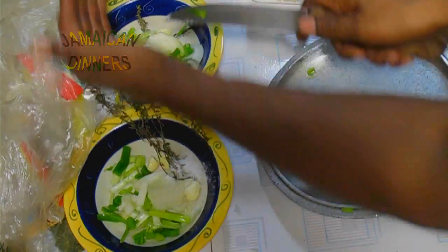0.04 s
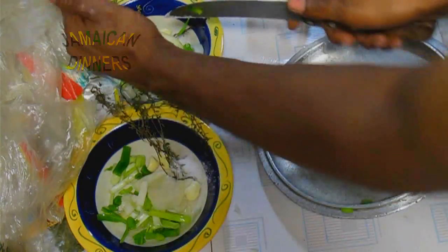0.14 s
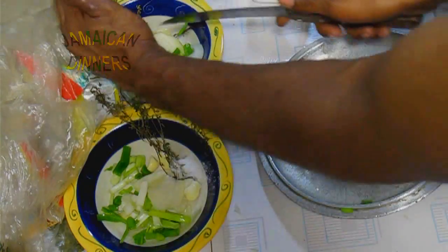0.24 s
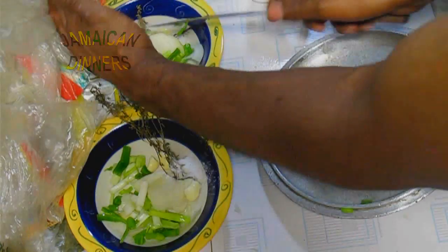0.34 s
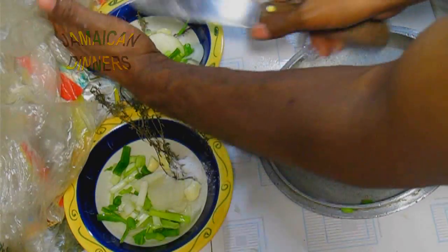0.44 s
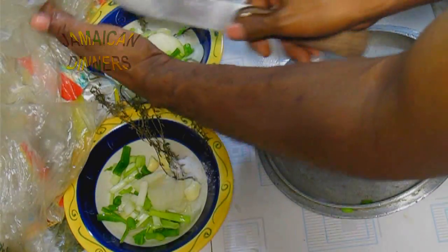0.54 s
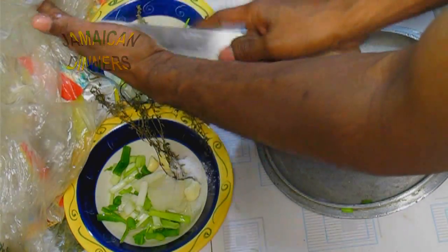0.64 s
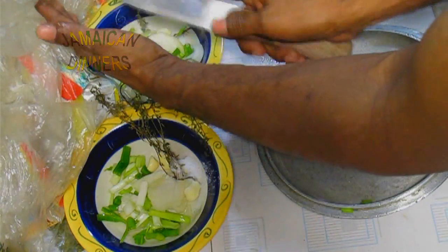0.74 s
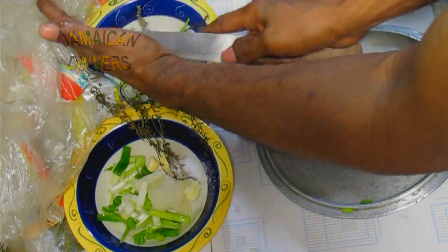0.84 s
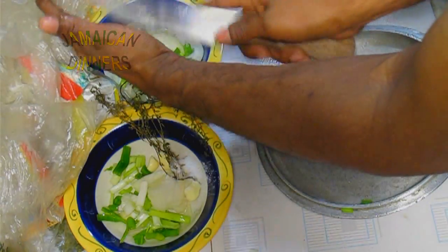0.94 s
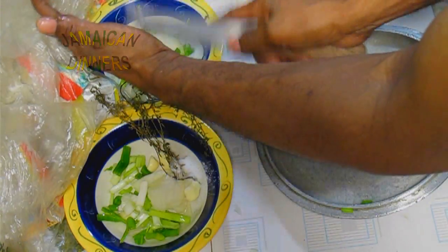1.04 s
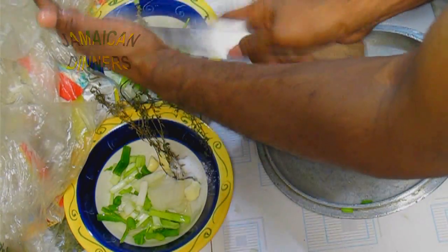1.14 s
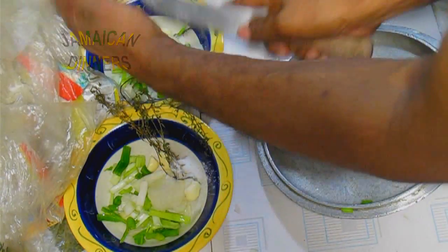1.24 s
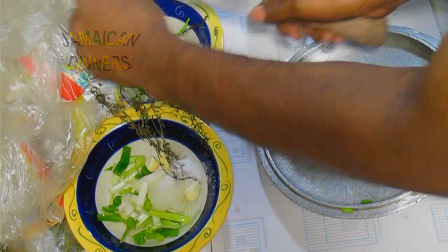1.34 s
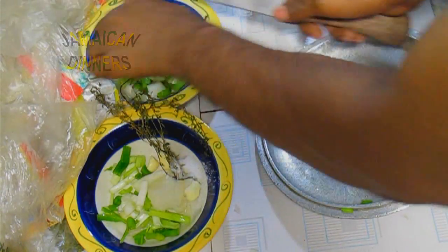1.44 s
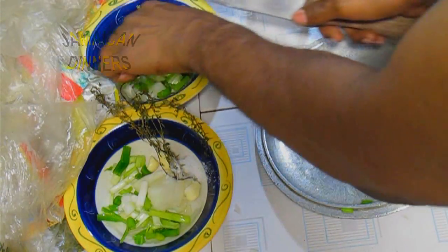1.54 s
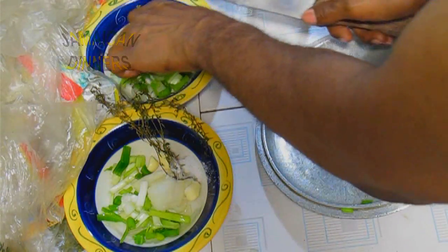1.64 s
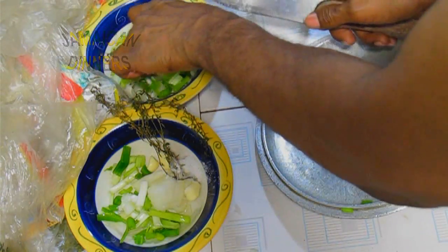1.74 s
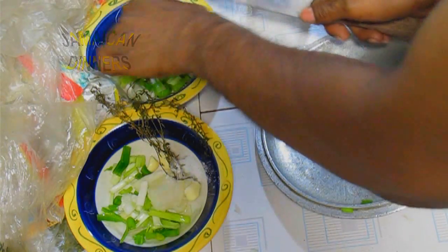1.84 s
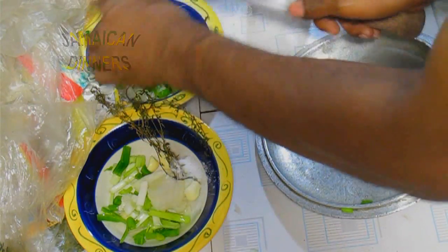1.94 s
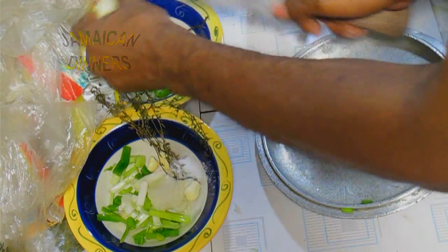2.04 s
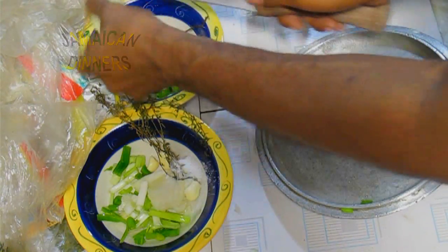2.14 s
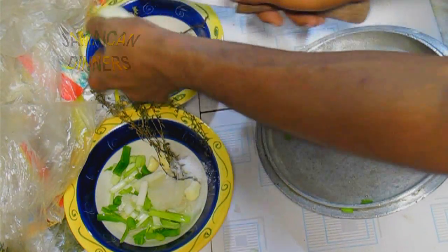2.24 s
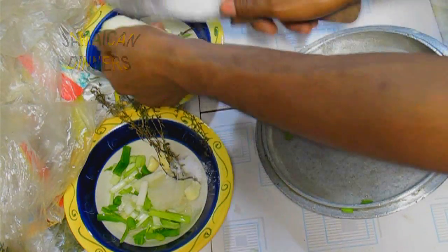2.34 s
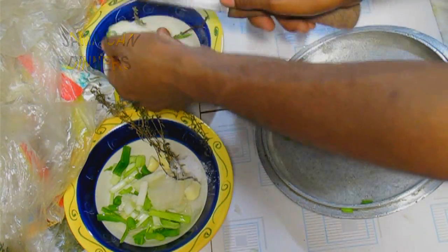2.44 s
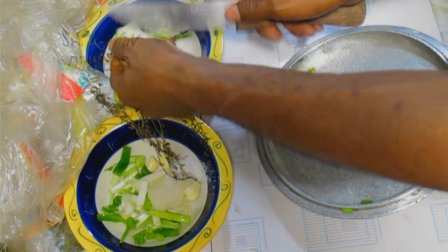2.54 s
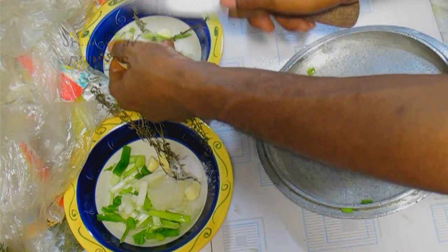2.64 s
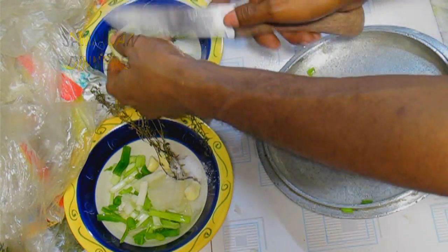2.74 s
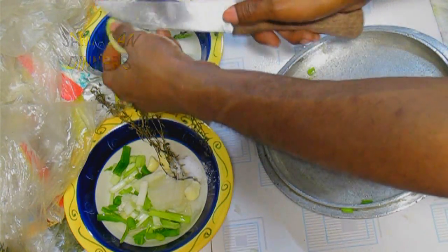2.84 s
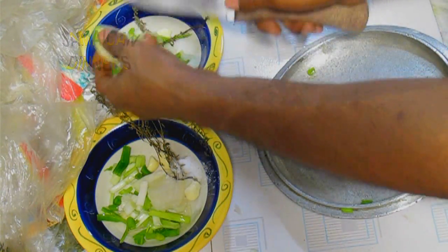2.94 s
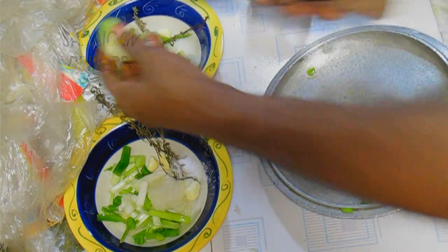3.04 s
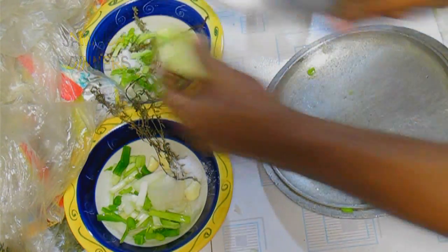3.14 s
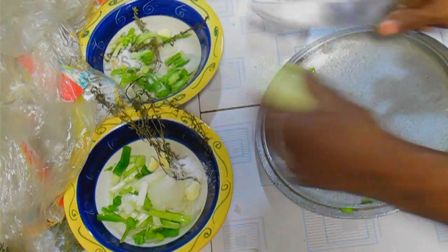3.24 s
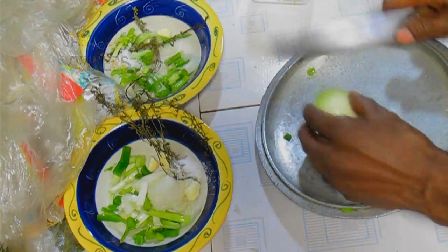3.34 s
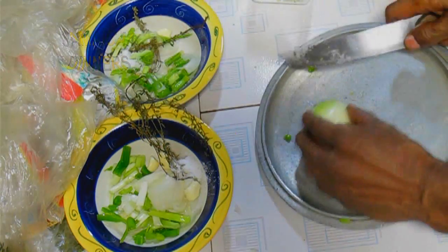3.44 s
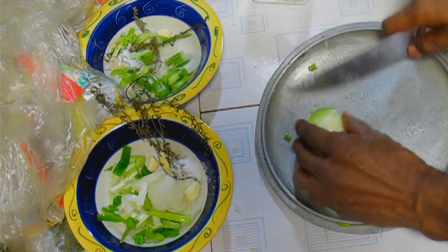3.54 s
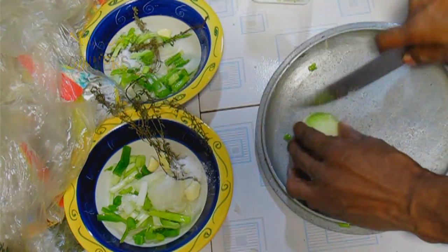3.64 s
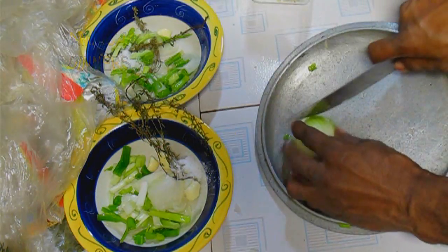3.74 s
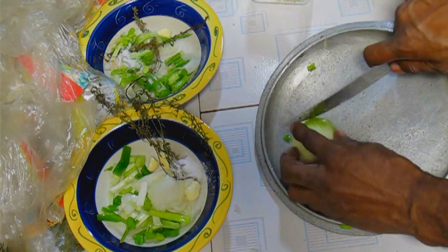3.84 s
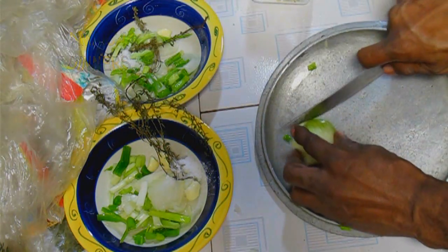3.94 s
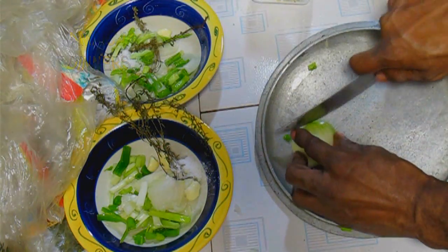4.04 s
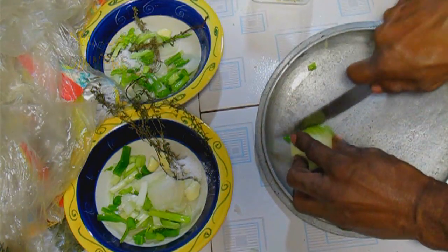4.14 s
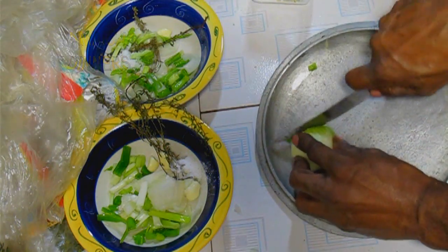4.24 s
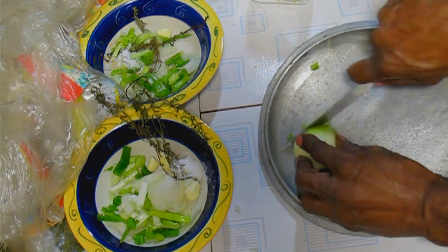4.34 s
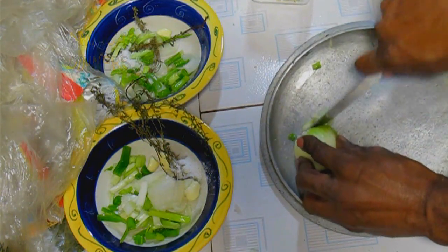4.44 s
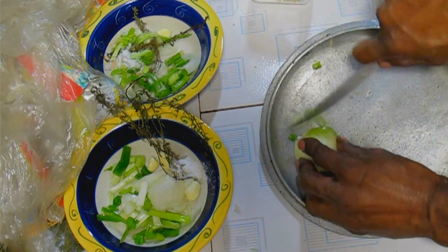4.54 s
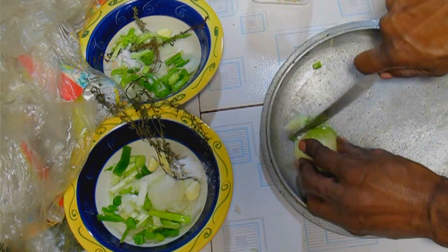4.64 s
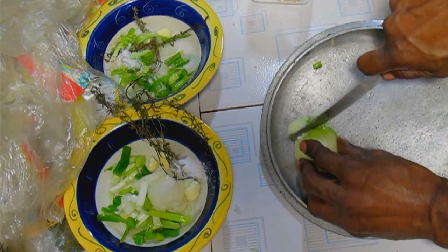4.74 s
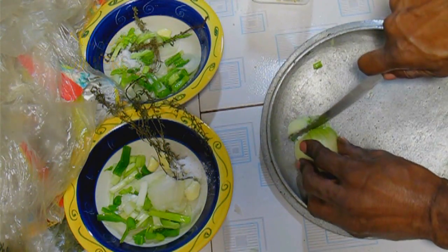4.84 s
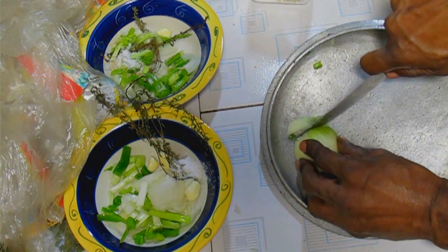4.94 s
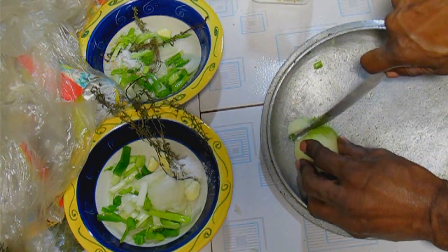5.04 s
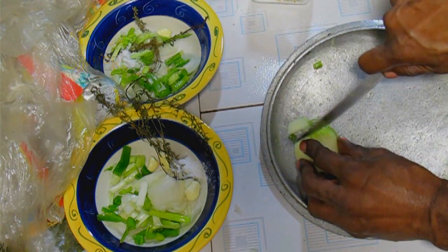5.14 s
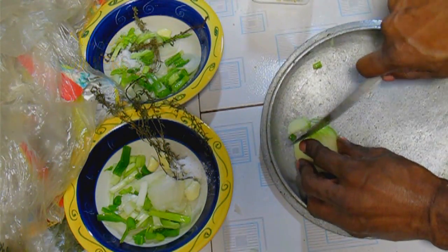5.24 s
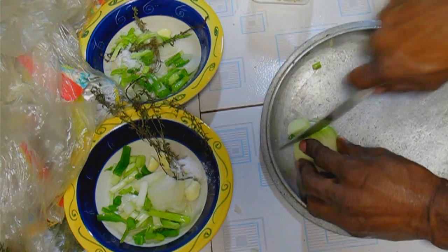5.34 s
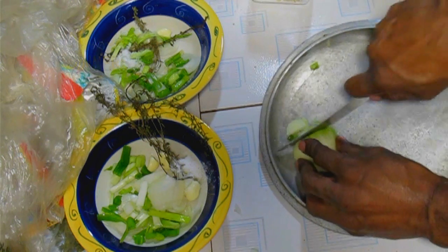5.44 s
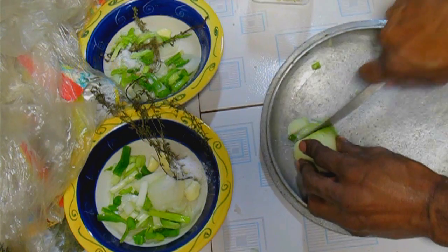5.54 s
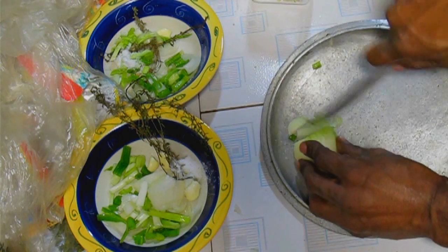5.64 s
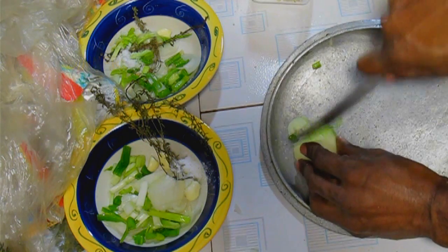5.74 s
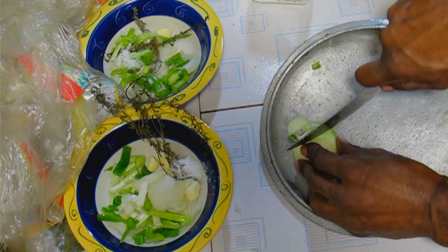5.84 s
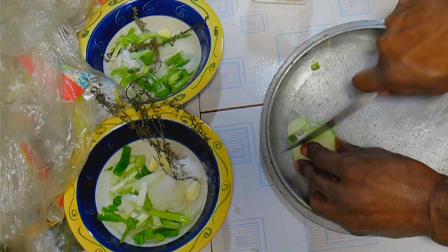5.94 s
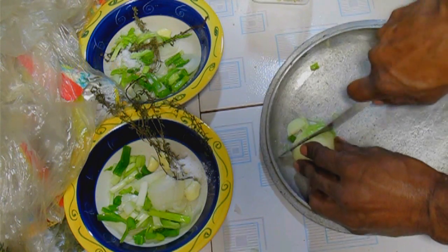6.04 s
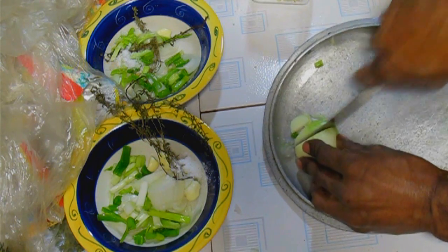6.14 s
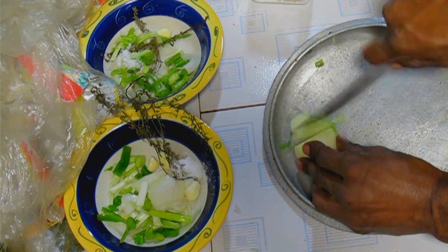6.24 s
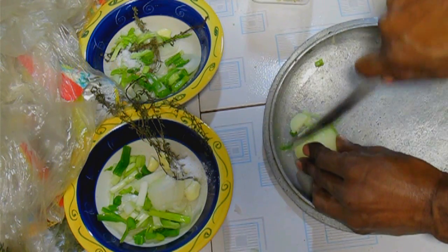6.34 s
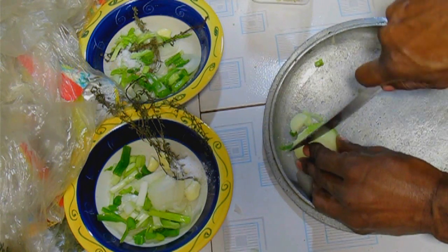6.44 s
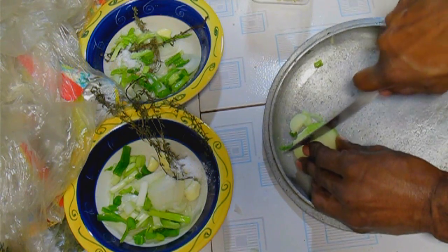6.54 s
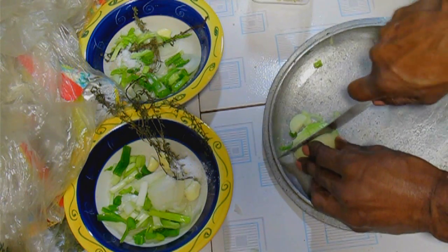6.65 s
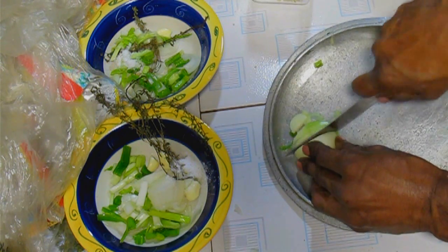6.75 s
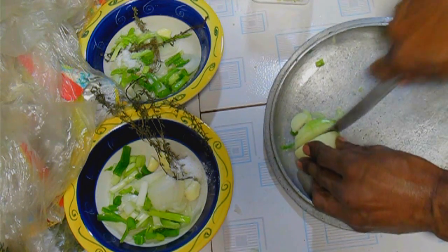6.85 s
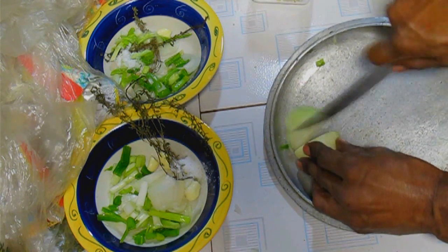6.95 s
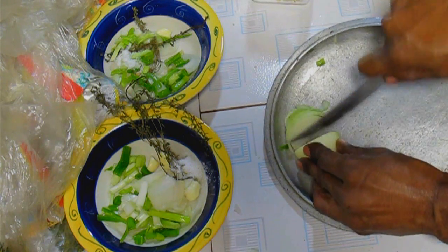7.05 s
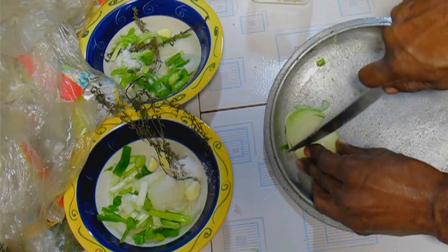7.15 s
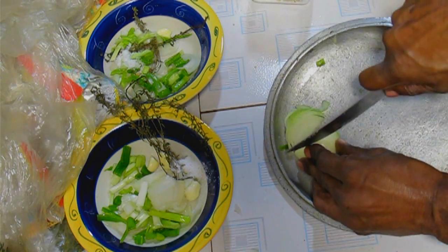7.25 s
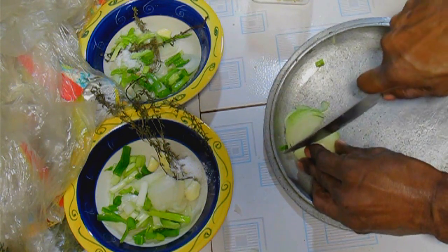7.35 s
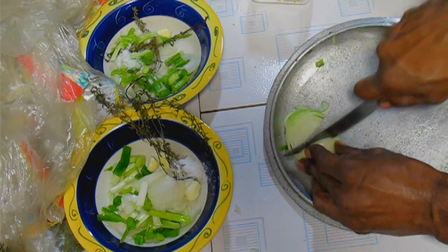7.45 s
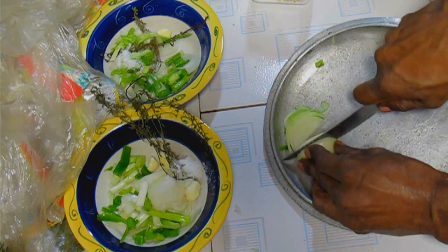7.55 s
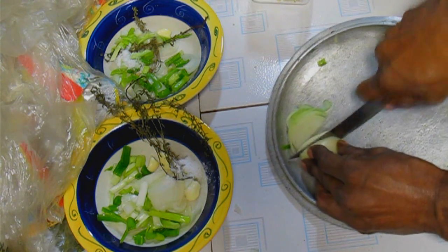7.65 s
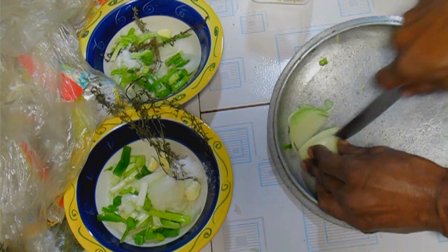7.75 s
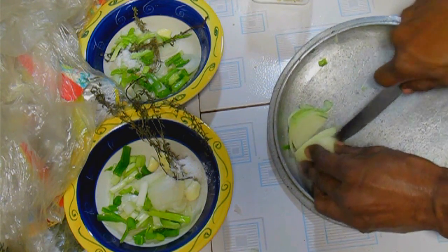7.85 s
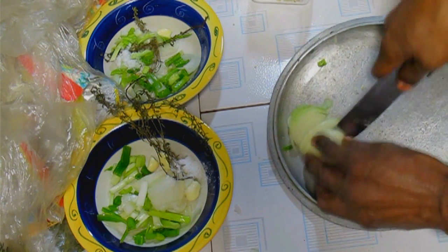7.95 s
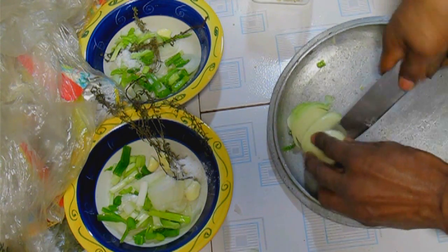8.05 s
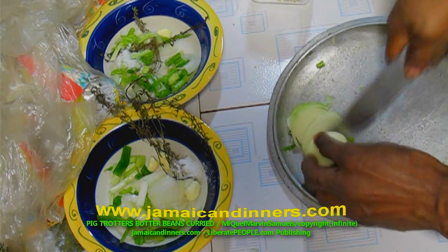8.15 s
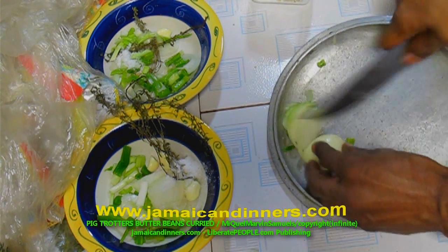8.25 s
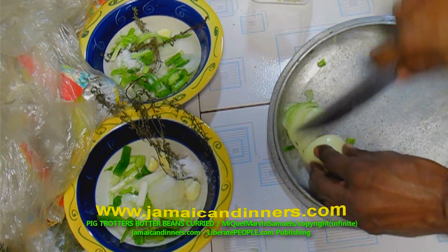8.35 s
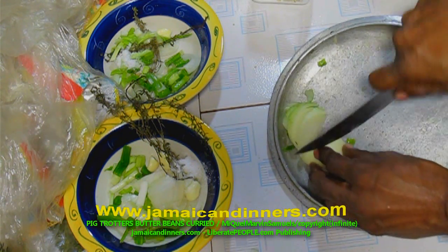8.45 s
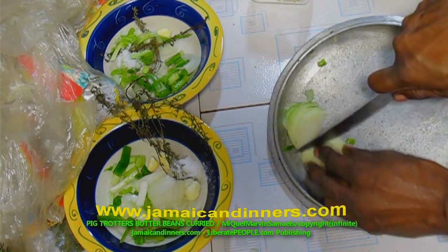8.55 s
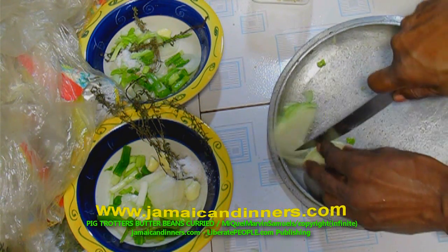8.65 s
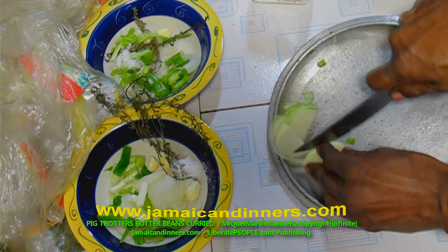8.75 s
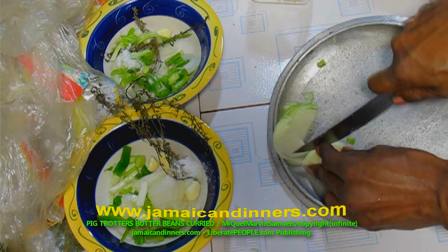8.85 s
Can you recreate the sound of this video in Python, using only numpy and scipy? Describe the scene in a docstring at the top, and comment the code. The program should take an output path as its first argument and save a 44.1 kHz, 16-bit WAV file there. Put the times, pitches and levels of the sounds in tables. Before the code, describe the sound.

A close microphone in a small kitchen picks up steady bright hiss, a faint throbbing low hum and a barely audible drifting tone that vanishes near 4 s. From 0 to 3 s, soft dull knife knocks on a bowl, tiny dry ticks, a short scrap rustle around 0.3-0.6 s and quick grainy wet swishes of fingers on steel, mostly 0.7-1.3 s, sparser later. At 3.5-3.6 s the knife clacks loudly on the tray, then a light scrape. Onion slicing comes in rapid crunch-and-knock clusters at about 4.2-4.4, 5.4-5.6, 6.0-6.2, 6.6-6.8 and 7.4-7.6 s: crisp crackle, short thin metallic ring, dull table thud, the hardest hits clipped. Gritty drags with faint high squeaks and soft pats fill the gaps. After 7.8 s only lighter taps and scrapes remain until about 8.9 s. The room tail is short.

```python
"""Slicing an onion on a metal tray

An onion is sliced on a thin metal tray in a small kitchen; before that a hand wipes scraps off the blade over a bowl.
Blows and knocks excite decaying modes and noise; drags, wipes and rustling scraps are friction noise under envelopes.
A bright hiss and a wavering hum lie beneath, with a faint drifting tone that dies away near the first blows.
A short diffuse room tail follows the work, and the microphone clips the strongest peaks."""
import sys
import numpy as np
from scipy import signal
from scipy.fft import rfft, irfft
from scipy.io import wavfile
from scipy.ndimage import map_coordinates

SR = 44100
rng = np.random.default_rng(int(sys.argv[2]) if len(sys.argv) > 2 else 0)


def inscribe(sig):
    """Save sig as 16-bit PCM at rate SR to the path in sys.argv[1].

    A 1-D sig is mono; a 2-D sig holds one channel per row.
    Samples are clipped to [-1, 1] before scaling.
    """
    pcm = np.round(np.clip(np.atleast_2d(sig).T, -1, 1) * 32767)
    wavfile.write(sys.argv[1], SR, pcm.astype(np.int16))


N = 392490   # length in samples

# Blade blows on the tray; low ring and bright edge are relative to the blow level:
# start_s, level_db, low_ring_db, ring_centre_octaves (above the lowest mode), bright_edge_db
BLOWS = [(3.989,-37.5,1.5,3,-21),(4.017,-35.5,6.5,3.26,-7),(4.218,-16,-8,1.93,-7),(4.237,-7.5,-2,0.56,-13.5),
         (4.251,-7.5,-14,1.06,-16),(4.278,-4.5,-19,1.65,-13),(4.393,-25.5,-26,1,-1),(4.408,-21.5,-21,1.2,-9),(4.415,-15.5,-19,2,-5),
         (4.427,-13,-19,1.2,-13),(4.432,5.5,-16,3.6,-18),(4.59,-34,3,2.7,-7),(4.875,-47.5,-30,1.5,10.5),(4.999,-25.5,-15,1.33,-7.5),(5.194,-27.5,-8,2.28,-7.5),
         (5.369,-26.5,-7.5,2.4,-11),(5.416,-22,-2,2.5,-7),(5.421,-15,-9.5,1.7,-5.5),(5.442,-7,-6,0.79,-12),(5.456,-3,-17,2.46,-14.5),
         (5.467,-3,-11,1.5,-15),(5.472,-14.5,11,2.47,-36),(5.525,-25,-17,2.9,-1),(5.562,-8.5,-19,1.2,-15),
         (5.57,1,-11.5,3.67,-3.5),(5.979,-14,-4,2.2,-7),(6.021,-15,0,2.34,-4),(6.047,-7,-4.5,1.86,-4.5),
         (6.065,-4.5,-9,1.38,-11),(6.078,-0.5,-11.5,2.1,-15),(6.097,-8,-8.5,2.76,-1.5),(6.109,1.5,-21,2.8,-8.5),
         (6.236,-24.5,-9,1.5,1),(6.247,-12,-6,3.72,-21),(6.572,-24,-7,2.24,-10.5),(6.63,-8,-3,2.16,-9.5),
         (6.649,-6,-12,2.64,-10),(6.668,-5,-5,1.46,-10.5),(6.687,-4,-13.5,2.4,-12.5),(6.717,.5,-26,4.4,-15),
         (6.722,-14.5,8.5,2.66,-33),(6.762,-5.5,-35,2.1,-12),(6.819,-20,-4,2.5,-10),(6.836,-1,-24,2.4,-21),(6.84,-12.5,0.5,3.16,-33),
         (6.976,-15,-22,2.2,-19),(7.014,-32,-22,1.5,-1),(7.366,-35.5,-8,2.3,-3),(7.404,-15,-11,2.3,-11),(7.454,-7.5,-5.5,2.3,-12.5),
         (7.48,-4.5,-3.5,2.16,-11),(7.499,-7.5,-9.5,2.6,-9.5),(7.524,-7.5,-6.5,2.4,-9),(7.552,-3,-11,2.18,-16),
         (7.567,-7,-16,2.56,-6),(7.581,-8.5,-5,2.77,-32),(7.623,-36,-21,3.2,-25),(7.698,-25.5,-2.5,2.45,-10),
         (7.727,-20.5,-12,3.7,-7.5),(7.815,-11,-7,3.78,-10.5),(7.923,-24.5,-7.5,2.2,-31),(7.962,-30,-22,2,-3),
         (8.005,-32,-26,2.8,0),(8.04,-28,-4,3.5,-27),(8.072,-26.5,-7,3.2,-16),(8.091,-18.5,-8,2.4,-38),
         (8.203,-22.5,-34,4.5,-3.5),(8.241,-21.5,-29,3.5,-6.5),(8.286,-31,-3,2.7,-26),(8.303,-38,6.5,2.95,-21),
         (8.327,-27.5,-8,2.8,-16),(8.342,-35.5,9,3.06,-25),(8.408,-39,-1.5,2.86,-18),(8.437,-36.5,0,2.9,-24),
         (8.456,-26.5,0.5,3.36,-35),(8.575,-33.5,-23,1.5,-15.5),(8.632,-26,-9,1.4,-9.5),(8.798,-33,3,3.5,-20),
         (8.855,-32,4,3.9,-23)]
# Modes of the thin tray: pitch_hz, width_hz, level_db
TRAY_MODES = [(168.4, 21, -2.5), (345.7, 15, -9), (520, 15, -5.5), (640.3, 18, -14.5), (922, 46.6, -0.5),
              (1150, 31, -9.5), (1412, 32, -2.5), (1755, 21, -21), (2084, 63, -19), (2242, 43, -18.5),
              (2605, 42, -28), (3028, 27, -16), (3650, 44, -32.5), (3666, 110, -13), (4000, 46, -16.5),
              (4480, 56, -41), (5084, 80, -10), (5430, 110, -26.5), (5400, 160, -24.5), (6770, 91, -8.5),
              (8190, 63, -8.5), (8575, 87, -6.5), (9160, 310, -17), (9290, 78, -9), (10400, 280, -20.5)]
# Colour of the onion's crack: frequency_hz, density_db (per Hz)
CRACK_SPECTRUM = [(180, 0), (300, -19.5), (733, 0.5), (1440, 2), (1760, -0.5), (2840, 7.5), (3300, 6.5),
                  (5160, -0.5), (5790, -5), (7540, -6), (9200, -3.5), (11000, -6), (12000, -15),
                  (15600, -29)]
UPPER_HZ, BRIGHT_HZ = 1800, 6000   # borders between the tray's groups of modes
CONTACT_PEAK_MS, CONTACT_SPREAD_DB = 1.17, 0.5   # rise time of a contact, and its scatter
BELOW_DB_PER_OCT, ABOVE_DB_PER_OCT = 9.5, 33.5   # fall of the ring below and above its centre

# Blade and onion dragged over the tray; deep and bright parts are relative to the level:
# start_s, end_s, first_level_db, last_level_db, deep_part_db, bright_part_db
DRAGS = [(3.756,3.92,-53.5,-58.5,-2,6.5),(3.992,4.218,-53,-47.5,-8.5,2.5),(4.3,4.343,-39,-65,-6,-9),
         (4.426,4.56,-36.5,-35.5,-7,-2),(5.375,5.413,-48,-47,-5,4),(5.504,5.54,-44,-57,5,8),(5.593,5.696,-37.5,-28.5,-15,-0.5),
         (6.13,6.185,-40,-30,-19,-3),(6.207,6.267,-36,-22.5,-13,-2.5),(6.824,6.833,-22.5,-21.5,-10.5,3),(6.87,6.982,-34.5,-30.5,-9.5,0),
         (7.66,7.81,-50,-34.5,-11,5.5),(7.832,7.908,-33.5,-49,-6,1.5),(7.943,8.088,-45.5,-51.5,-0.5,6),
         (8.102,8.173,-42.5,-56,-4,-10),(8.19,8.34,-40,-54,-5.5,2.5),(8.664,8.721,-38.5,-51,0,1)]
# Colour of the rubbing: frequency_hz, density_db (per Hz)
RUB_SPECTRUM = [(590, -38), (1000, 7.5), (1260, -7.5), (1440, 5), (1900, -42.5), (2140, -5), (3050, 5.5),
                (3340, 2.5), (5120, -6), (7480, -17), (8890, -2), (11800, -11), (15600, -40.5)]
# The sliding edge sings: start_s, end_s, pitch_hz, level_db (against the drag's middle part)
SINGING = [(3.75, 3.83, 2900, 4), (3.848, 3.92, 2765, 4), (4.426, 4.585, 2720, -1), (5.606, 5.75, 3030, -1),
           (6.22, 6.298, 3085, -1), (6.884, 6.99, 3130, 0), (7.68, 7.783, 3550, 1),
           (7.835, 7.897, 3090, -1), (8.16, 8.298, 3970, 7), (8.19, 8.282, 5290, 8.5),
           (8.652, 8.72, 4120, -3)]
DRAG_ATTACK_S, DRAG_RELEASE_S = 0.015, 0.029

# The knife knocked against bowl and tray: start_s, level_db, contact_cutoff_hz, long_ring_db
KNOCKS = [(.017, -26.5, 1510, 9), (.173, -22, 1500, 8), (.322, -26.5, 900, 6), (1.957, -24, 1200, 6.5),
          (2.089, -34.5, 900, 6), (3.065, -36.5, 700, 10), (3.475, -21.5, 900, 0), (3.495, -12.5, 1690, 4),
          (3.574, 2, 5030, 2.5), (3.598, -11.5, 2530, 3)]
# Modes of the knife: pitch_hz, level_db, t60_s
KNIFE_MODES = [(519, -14.5, 0.15), (920, -19, 0.092), (1060, 9, 0.024), (1246, -16.5, 0.16),
               (1640, -17, 0.15), (2190, 1, 0.039), (2635, 4.5, 0.034), (2750, -12, 0.052),
               (2910, -11.5, 0.16), (4100, -14, 0.1), (4600, 2.5, 0.013), (5190, -6.5, 0.056),
               (6820, -10, 0.12), (8700, -15, .06), (8730, -13, 0.21), (10650, -15, .08)]
LONG_RING_S = .12   # modes with a longer t60 form the long ring

# Fingers wiping the wet blade: middle_s, level_db, spread_ms (of a bell-shaped swell), pitch_hz
WIPES = [(0.749, -34, 15, 2480), (.86, -49, 15, 2960), (0.929, -29, 11.4, 2890), (1.09, -26, 12.1, 2800),
         (1.15, -43.5, 6.3, 2500), (1.262, -27.5, 8.8, 3200), (1.31, -46.5, 13, 2960),
         (1.855, -40, 9.8, 2340), (2.385, -43, 6, 2300), (2.61, -44.5, 5, 2720), (2.798, -33, 5.8, 2400),
         (2.951, -42.5, 10, 2330)]
# Colour of the wiping: frequency_hz, density_db (per Hz)
WIPE_SPECTRUM = [(180, -56), (300, -7), (562, -7), (1090, -43), (1350, 3), (1620, -3.5), (2530, 4),
                 (3090, 1.5), (6720, -11), (9820, 5.5), (11800, -5.5), (15600, -31)]

# Dry ticks while scraps are picked off: start_s, level_db, upper_edge_hz
TICKS = [(0.256, -19.5, 3750), (0.296, -19, 4250), (0.348, -36, 8980), (0.386, -15, 9540),
         (0.396, -17, 9580), (0.417, -17, 9440), (0.478, -17, 7070), (0.489, -27, 9470),
         (0.564, -20.5, 7820), (0.612, -23, 8980), (0.672, -12, 9750), (0.907, -16, 2700),
         (1.067, -23, 9870), (1.306, -19, 9500), (1.5, -21.5, 9700), (1.851, -23, 6100), (2.047, -36, 6780),
         (2.385, -31, 9180), (2.788, -33, 9780), (2.789, -18, 4300), (2.939, -26, 9300), (2.94, -30, 4600),
         (4.686, -24, 3100), (5.843, -24, 1610), (7.141, -17.5, 1590)]
# Soft pats, bits of onion and fingers settling: start_s, level_db, pitch_hz, t60_s
PATS = [(.906, -21, 530, 0.011), (3.04, -39, 595, 0.028), (3.503, -25, 174, .08), (3.67, -33, 188, 0.067),
        (5.242, -28, 162, 0.062), (5.844, -25, 1660, 0.012), (5.89, -31, 185, 0.055),
        (6.489, -31, 172, 0.067), (7.139, -19.5, 1360, 0.015), (7.18, -37.5, 163, 0.087),
        (8.63, -23, 163, 0.068)]

# Scraps brushed off the palm: start_s, end_s, first_level_db, last_level_db
RUSTLE = [(.29, .5, -43, -35), (.51, .646, -43.5, -41)]
# Colour of the brushed scraps: frequency_hz, density_db (per Hz)
SCRAPS_SPECTRUM = [(180, -50), (300, -23), (535, -2.5), (1330, -9), (1850, -0.5), (6390, -4), (9820, 1.5),
                   (11800, -9), (15600, -37)]
RUSTLE_ATTACK_S, RUSTLE_RELEASE_S = 0.016, 0.0055

ROOM_T60_S, ROOM_DB = 0.25, -10.5

# Colour of the background hiss: frequency_hz, density_db (per Hz)
HISS_SPECTRUM = [(15, -21.5), (25, -0.5), (64, -7), (101, -5), (200, -8.5), (446, -13.5), (1030, -13),
                 (2020, -17.5), (3600, -16.5), (4400, -10), (7300, -13.5), (9880, -10), (11000, -11.5),
                 (12600, -22), (15600, -30)]
# Brighter bands in the hiss: centre_hz, width_hz, level_db
HISS_BANDS = [(4790, 110, 0.5), (5890, 210, 1.5), (6640, 430, 5), (7760, 270, 3), (8800, 180, 6),
              (9720, 320, 8.5)]
HISS_DB = -48.5   # rms of the hiss without its brighter bands

# Two hum tones: pitch_hz, level_db
HUM = [(100, -66), (151, -70)]
HUM_BEAT_HZ, HUM_BEAT_PEAK_S, HUM_BEAT_DEPTH = 1.82, 2.2, .7   # throb of the lower tone

# Drifting pitch of a faint far tone: time_s, pitch_hz
WHINE = [(0, 1060), (1.1, 1053), (1.7, 950), (2.3, 973), (2.7, 1065), (3.4, 1139), (3.9, 1100)]
WHINE_DB, WHINE_FADE_S = -72, 3.7   # level, and the moment it begins to die away

NOTCH_HZ, NOTCH_WIDTH_HZ = 11730, 1620   # a null of the microphone in its housing
CUTOFF_HZ = 15850


def blows():
    """Impact excitation: a short crack, a wash of dense high modes and the ring of the tray's strong modes."""
    s, level_db, _, _, edge_db = np.transpose(BLOWS)
    bright_db = level_db + edge_db
    # where the blade lands decides which modes speak; the last column scatters the contact time
    scatter = rng.normal(0, 1, (len(s), len(TRAY_MODES) + 1))
    contact_ms = CONTACT_PEAK_MS * from_db(CONTACT_SPREAD_DB * scatter[:, -1])
    body, edge = split(colour(noise(), CRACK_SPECTRUM), BRIGHT_HZ)

    body_crack = from_db(-17.5) * bursts(s, level_db, contact_ms)
    body_wash = from_db(-17.0) * dying(clicks(s, level_db), 0.084)
    edge_crack = from_db(0.5) * bursts(s, bright_db, contact_ms)
    edge_wash = from_db(0.5) * dying(clicks(s, bright_db), 0.099)
    out = body * (body_crack + body_wash) + edge * (edge_crack + edge_wash)

    for (hz, width_hz, db), chance in zip(TRAY_MODES, scatter.T):
        if hz < UPPER_HZ:
            blow_db = low_ring_db(hz)
        elif hz < BRIGHT_HZ:
            blow_db = level_db - 6.0
        else:
            blow_db = bright_db - 3.0
        out += ring(clicks(s, blow_db + db + 4.8 * chance), hz, width_hz)
    return out


def low_ring_db(hz):
    """Selective excitation: each blow drives a low mode most strongly near the centre of its ring."""
    _, level_db, ring_db, centre, _ = np.transpose(BLOWS)
    octaves = np.log2(hz / TRAY_MODES[0][0]) - centre
    slope = np.where(octaves > 0, ABOVE_DB_PER_OCT, -BELOW_DB_PER_OCT)
    return level_db + ring_db - slope * octaves


def bursts(times, db, contact_ms):
    """Contact force: an envelope that swells to its peak and fades within each contact."""
    out, t = np.zeros(N + SR // 10), np.arange(SR // 10) / SR
    starts = np.round(times * SR).astype(int)
    for at, gain, ms in zip(starts, from_db(db), np.clip(contact_ms, .2, 8)):
        phase = 1000 * t / ms
        out[at:at + len(t)] += gain * phase * np.exp(1 - phase)
    return out[:N]


def thuds():
    """Compliant support: the table under the tray yields with a dull rumble at each deep blow."""
    s = np.transpose(BLOWS)[0]
    envelope = dying(clicks(s, low_ring_db(TRAY_MODES[0][0])), 0.24)
    rumble = split(noise() * envelope, 153)[0]
    return from_db(-13.5) * rumble * np.sqrt(SR / 220)   # makes up for the narrow band


def drags():
    """Friction: grit under the blade hisses and drives the tray's modes, damped by the pressing blade."""
    rough = grit(per_s=2800, spread_db=0.5) * from_db(2.0 * drift(45))     # the edge catches and slips
    modes = np.zeros(N)
    for k, (hz, width_hz, db) in enumerate(TRAY_MODES):
        drive = rough * from_db(3 * drift(16))   # the favoured modes change as the contact moves
        mode = ring(drive, hz, width_hz + hz / 40)
        modes += from_db(db) * np.sqrt(width_hz) * mode * (-1) ** k   # neighbours in opposite phase
    sound = rms_one(colour(rough, RUB_SPECTRUM)) + from_db(2) * rms_one(modes)

    deep, rest = split(sound, 1510)
    middle, bright = map(rms_one, split(rest, BRIGHT_HZ))
    for start, end, hz, db in SINGING:
        part = slice(round(start * SR), round(end * SR))
        tone = rms_one(ring(rough[part], hz, 43))
        middle[part] += from_db(db) * tone * np.hanning(part.stop - part.start)

    deep_db, bright_db = np.transpose(DRAGS)[-2:]
    parts = ((0, middle), (deep_db, rms_one(deep)), (bright_db, bright))
    return sum(strokes(DRAGS, DRAG_ATTACK_S, DRAG_RELEASE_S, db) * part for db, part in parts)


def knocks():
    """Modal impact: the knife's modes, a sharp crack and a dull wash; a softer contact passes less treble."""
    out, t = np.zeros(N), np.arange(SR // 3) / SR
    for s, db, cut_hz, long_db in KNOCKS:
        modes = np.zeros(len(t))
        for hz, mode_db, t60 in KNIFE_MODES:
            decay_db = mode_db + long_db * (t60 > LONG_RING_S) - 60 * t / t60
            modes += from_db(decay_db) * np.sin(2 * np.pi * hz * t)
        crack = rng.standard_normal(len(t)) * from_db(-60 * t / 0.024)
        wash = split(rng.standard_normal(len(t)), 2730)[0] * from_db(-60 * t / 0.1)
        sound = from_db(-13.0) * modes + from_db(-8.5) * crack + from_db(-6.0) * wash
        softened = signal.lfilter(*signal.butter(1, cut_hz, fs=SR), sound)
        out[round(s * SR):][:len(t)] += from_db(db) * softened
    return split(out, 346)[1]


def wipes():
    """Wet friction: skin on steel gives a grainy swish that swells and fades, with a broad pitch of its own."""
    rough, t = noise() + .6 * grit(per_s=900, spread_db=3.5), np.arange(N) / SR
    swish, out = rms_one(colour(rough, WIPE_SPECTRUM)), np.zeros(N)
    for s, db, ms, hz in WIPES:
        part = slice(round((s - .08) * SR), round((s + .08) * SR))
        pitched = from_db(-12.0) * rms_one(ring(rough[part], hz, 440))
        swell = np.exp(-.5 * (1000 * (t[part] - s) / ms) ** 2)
        out[part] += from_db(db) * (swish[part] + pitched) * swell
    return out


def ticks():
    """Transient noise: a few milliseconds of decaying noise in a broad band."""
    out, t = np.zeros(N), np.arange(SR // 20) / SR
    for s, db, hz in TICKS:
        band = signal.butter(1, [hz / 1.85, hz], "band", fs=SR, output="sos")
        burst = rng.standard_normal(len(t)) * from_db(-60 * t / 0.019)
        out[round(s * SR):][:len(t)] += from_db(db - 5.5) * signal.sosfilt(band, burst)
    return out


def pats():
    """Damped oscillation: one decaying tone with a soft start."""
    out, t = np.zeros(N), np.arange(SR // 4) / SR
    for s, db, hz, t60 in PATS:
        tone = from_db(db - 60 * t / t60) * np.sin(2 * np.pi * hz * t)
        out[round(s * SR):][:len(t)] += tone * (1 - np.exp(-t * hz))
    return out


def rustle():
    """Random micro-impacts: the scraps make a fine crackle that comes in clumps."""
    crackle = grit(per_s=1500, spread_db=4.0) * from_db(3 * drift(60))
    texture = rms_one(colour(crackle + noise(), SCRAPS_SPECTRUM))
    return strokes(RUSTLE, RUSTLE_ATTACK_S, RUSTLE_RELEASE_S) * texture


def kitchen(x):
    """Diffuse reverberation: a tail of exponentially decaying noise after a short gap."""
    t = np.arange(SR // 2) / SR
    tail = rng.standard_normal(len(t)) * from_db(-60 * t / ROOM_T60_S) * (t > .004)
    return signal.fftconvolve(x, tail / np.sqrt(np.sum(tail ** 2)))[:N]


def background():
    """Stationary noise: a steady hiss with a few brighter resonant bands whose levels drift slowly."""
    bands = np.zeros(N)
    for hz, width_hz, db in HISS_BANDS:
        bands += from_db(db + 2.0 * drift(3.265)) * np.sqrt(width_hz) * ring(noise(), hz, width_hz)
    return from_db(HISS_DB) * (colour(noise(), HISS_SPECTRUM) + from_db(-2.5) * rms_one(bands))


def hum():
    """Amplitude and frequency modulation: two low tones waver a little; the lower throbs."""
    t = np.arange(N) / SR
    throb = 1 + HUM_BEAT_DEPTH * np.cos(2 * np.pi * HUM_BEAT_HZ * (t - HUM_BEAT_PEAK_S))
    low, high = (tone(hz + 1.5 * drift(3.2), db + 2.8 * drift(5.4)) for hz, db in HUM)
    return throb * low + high


def whine():
    """Frequency modulation: a faint tone drifts in pitch, wavers in level and dies away."""
    t = np.arange(N) / SR
    hz = np.interp(t, *np.transpose(WHINE)) + 4 * drift(7.2)
    fade_db = 30 * np.maximum(t - WHINE_FADE_S, 0)   # 30 dB per second
    return tone(hz, WHINE_DB + 1.7 * drift(3.9) - fade_db)


def tone(hz, db):
    """Phase is the running sum of frequency: a sine with changing pitch and rms level."""
    return from_db(db) * np.sqrt(2) * np.sin(2 * np.pi * np.cumsum(hz) / SR)


def from_db(db):
    """Logarithmic level to amplitude ratio."""
    return 10 ** (np.asarray(db) / 20)


def rms_one(x):
    """Normalisation to unit effective value."""
    return x / np.sqrt(np.mean(x ** 2) + 1e-20)


def noise():
    """White noise: equal power at all frequencies, rms 1."""
    return rng.standard_normal(N)


def colour(x, spectrum):
    """Minimum-phase filter with the given dB over log frequency; white noise keeps rms 1."""
    hz, db = np.transpose(spectrum)
    grid_hz = np.fft.rfftfreq(4096, 1 / SR) + 1
    log_gain = np.interp(np.log(grid_hz), np.log(hz), db) * np.log(10) / 20
    cepstrum = irfft(log_gain)
    cepstrum[1:2048] *= 2   # folding the cepstrum makes the phase minimal
    cepstrum[2049:] = 0
    pulse = irfft(np.exp(rfft(cepstrum)))
    return signal.fftconvolve(x, pulse / np.sqrt(np.sum(pulse ** 2)))[:N]


def strokes(rows, attack_s, release_s, part_db=0):
    """Stroke envelope: fades in, moves evenly in dB from first to last level and fades out."""
    gain, t = np.zeros(N), np.arange(N) / SR
    for (start, end, first_db, last_db, *_), db in zip(rows, part_db + np.zeros(len(rows))):
        inside = slice(round((start - attack_s) * SR), round((end + release_s) * SR))
        corners = [start - attack_s, start, end, end + release_s]
        fade = np.interp(t[inside], corners, [0, 1, 1, 0])
        level_db = db + np.interp(t[inside], [start, end], [first_db, last_db])
        gain[inside] += fade ** 2 * from_db(level_db)
    return gain


def clicks(times, db):
    """Impulse train: one sample per event over a negligible floor."""
    train = np.full(N, 1e-18)
    np.add.at(train, np.round(np.asarray(times) * SR).astype(int), from_db(db))
    return train


def ring(x, hz, width_hz):
    """Damped resonator: a unit click sets a sine of height 1 ringing."""
    r, w = np.exp(-np.pi * width_hz / SR), 2 * np.pi * hz / SR
    return signal.lfilter([0, np.sin(w)], [1, -2 * r * np.cos(w), r * r], x)


def dying(train, t60):
    """Exponential decay: an envelope that jumps at each click and falls 60 dB in t60 seconds."""
    return signal.lfilter([1], [1, -from_db(-60 / (t60 * SR))], train)


def split(x, hz):
    """Crossover: the parts below and above a frequency."""
    return [signal.sosfilt(signal.butter(3, hz, kind, fs=SR, output="sos"), x) for kind in ("low", "high")]


def grit(per_s, spread_db):
    """Rough contact: dense random impulses of uneven size and sign; rms 1."""
    sizes_db = spread_db * np.minimum(rng.exponential(1, N), 4)
    sizes = from_db(sizes_db) * rng.choice([-1, 1], N)
    return rms_one(sizes * (rng.random(N) < per_s / SR))


def drift(rate):
    """Slow random fluctuation: smoothed steps, rate per second, with a spread of about 1."""
    steps = rng.standard_normal(int(N / SR * rate) + 3)
    return map_coordinates(steps, [np.arange(N) * rate / SR], order=2, prefilter=False) * np.sqrt(2)


def scene():
    """Superposition: the work and its reverberation add to the table's thuds and the background."""
    work = blows() + drags() + knocks() + ticks() + pats() + wipes() + rustle()
    work = split(work, 123)[1]       # small objects radiate little deep bass
    room = from_db(ROOM_DB) * kitchen(work)
    return (work + room + thuds() + background() + hum() + whine())[None]


def record(dry):
    """Microphone response: a null in the high treble, clipping of the strongest peaks, then a cut of the top."""
    heard = signal.lfilter(*signal.iirnotch(NOTCH_HZ, NOTCH_HZ / NOTCH_WIDTH_HZ, SR), dry)
    clipped = np.clip(heard, -1, 1)
    return signal.sosfilt(signal.ellip(12, .5, 30, CUTOFF_HZ, fs=SR, output="sos"), clipped)


dry = scene()
out = record(dry)
inscribe(out)
```